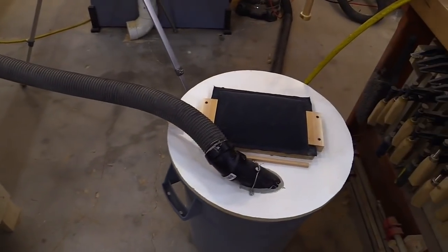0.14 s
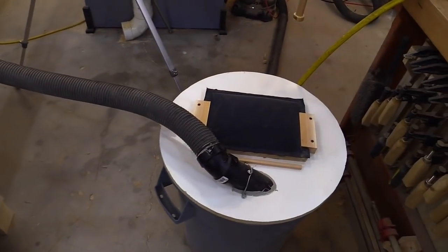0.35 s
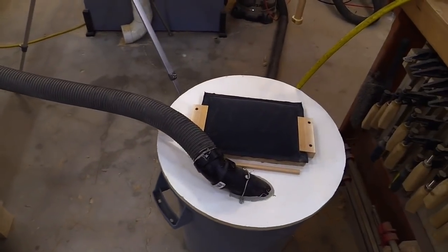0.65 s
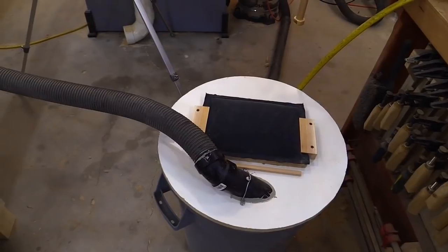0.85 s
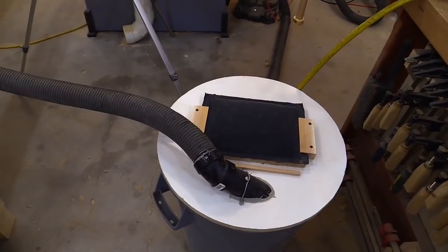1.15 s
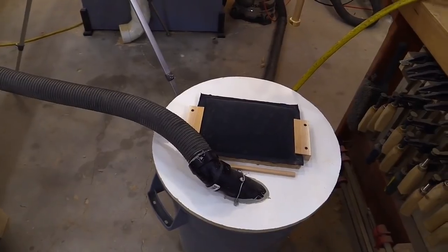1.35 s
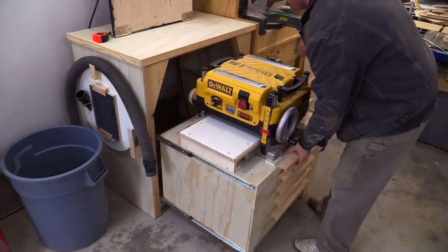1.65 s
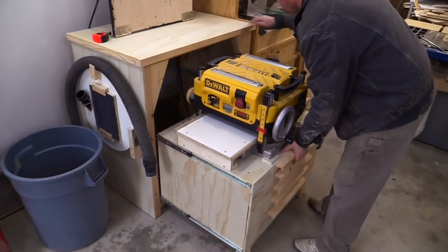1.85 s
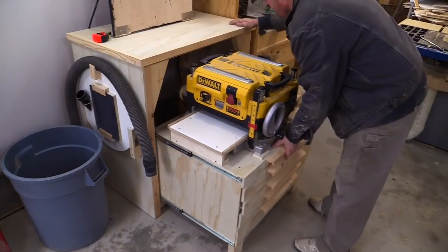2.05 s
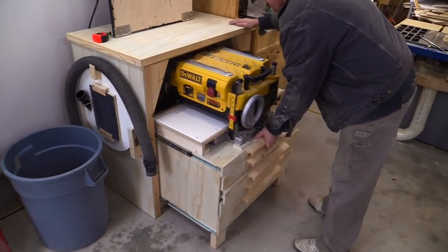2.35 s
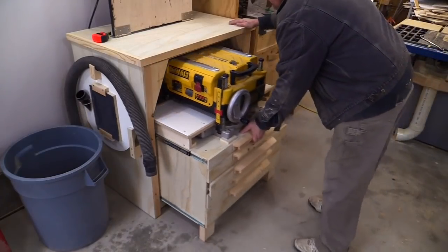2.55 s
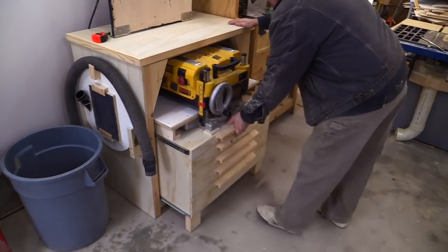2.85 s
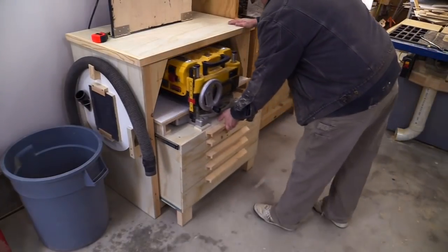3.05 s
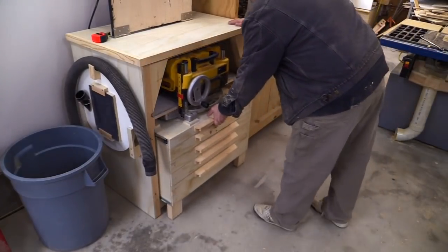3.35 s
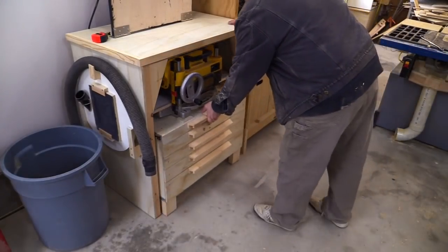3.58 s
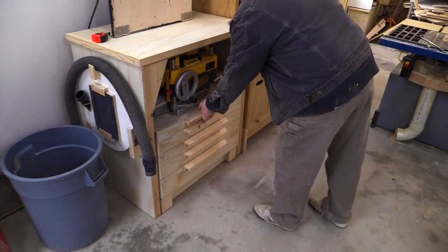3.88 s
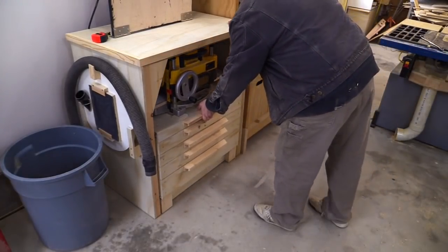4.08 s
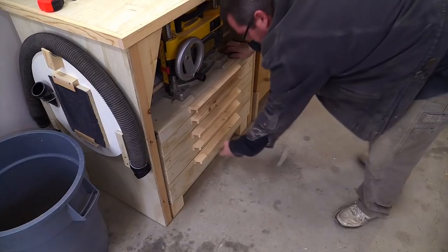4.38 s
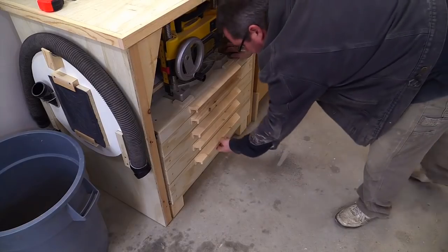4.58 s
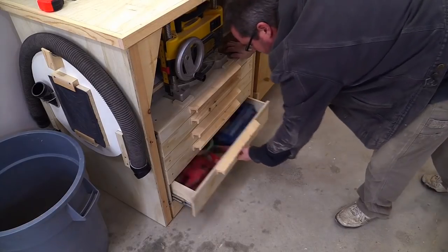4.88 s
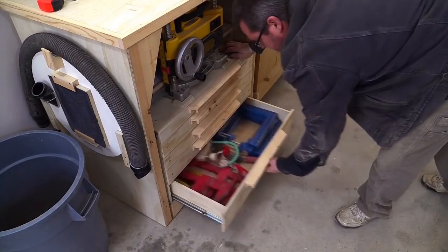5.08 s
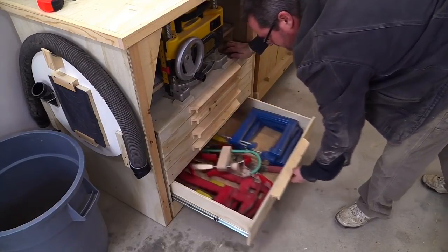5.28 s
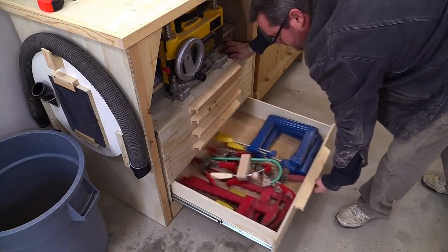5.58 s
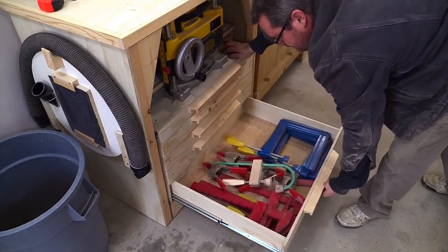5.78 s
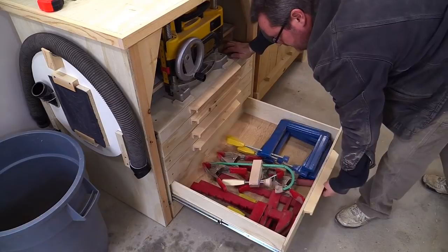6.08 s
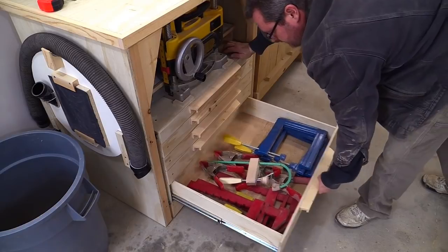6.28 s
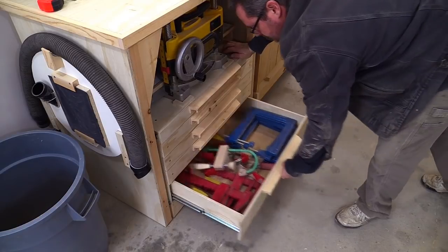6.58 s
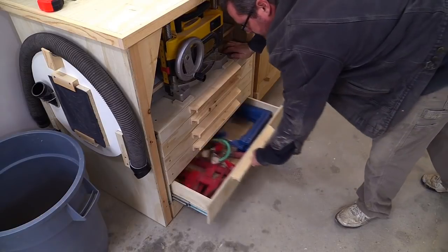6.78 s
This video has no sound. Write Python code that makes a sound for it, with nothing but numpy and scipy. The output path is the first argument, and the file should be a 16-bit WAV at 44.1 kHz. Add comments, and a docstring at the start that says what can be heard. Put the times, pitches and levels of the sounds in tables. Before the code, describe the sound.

In a small workshop, a planer whines steadily at a board, rises slightly in pitch as the board leaves, then breaks off sharply. A heavy carriage groans and rolls on ball-bearing slides into a cabinet, with a hard clack, thuds and a shoe scuff, slowing to a creep. A drawer of tools rolls out more quietly, slams against its stop with clinking clamps, and starts back. Stereo microphones at moderate distance, short room decay.

```python
"""A small workshop, heard by two microphones over its quiet air. A thickness planer whines at its board,
loses the load as the board leaves the knives, and breaks off. After faint handling noise a heavy wooden
carriage groans and rolls into a cabinet on ball-bearing slides, slowing to a creep, with bumps and clacks,
while a shoe scuffs the concrete. A drawer full of tools rolls out, slams against its end stop with its
clamps clinking, and starts to roll back.
Tones make the planer, shaped noise the friction and air, tiny bumps the rolling, ringing modes the blows."""
import sys
import numpy as np
from scipy import signal
from scipy.fft import rfft, irfft, next_fast_len
from scipy.io import wavfile
from scipy.ndimage import uniform_filter1d, minimum_filter1d

SR = 44100
rng = np.random.default_rng(int(sys.argv[2]) if len(sys.argv) > 2 else 0)


def put_to_file(sound):
    """Save the sound as 16-bit audio at rate SR, in the file named by the first command-line argument."""
    columns = np.atleast_2d(sound).T  # one column per channel
    safe = np.clip(columns, -1, 1)
    whole_steps = np.round(safe * 32767)
    wavfile.write(sys.argv[1], SR, whole_steps.astype(np.int16))


N = 305613
TIME = np.arange(N) / SR  # s


def amp(db):
    """Decibels to gain."""
    return 10 ** (np.asarray(db) / 20)


def evened(x):
    """Scales to unit rms."""
    return x / np.sqrt(np.mean(x ** 2) + 1e-20)


def at_level(sound, db):
    """Sets the rms level of the first 40 ms of a blow."""
    return amp(db) * sound / np.sqrt(np.mean(sound[:, :SR // 25] ** 2))


def read(points, hz):
    """Reads a table on a log-frequency axis."""
    f, value = np.transpose(points)
    return np.interp(np.log(hz + 1), np.log(f + 1), value)


def curves(rows):
    """Joins the rows of a timed table by straight lines, one curve per column."""
    s, *columns = np.transpose(rows)
    return [np.interp(TIME, s, column) for column in columns]


def add(mix, s, sound):
    """Mixes a sound in at time s."""
    part = mix[:, round(s * SR):][:, :sound.shape[1]]
    part += sound[:, :part.shape[1]]


def wander(rate, size=N):
    """Random drift through knots of unit spread, `rate` knots per second."""
    knots = rng.standard_normal(2048)
    return np.interp(TIME[:size] * rate, np.arange(len(knots)), knots)


def colour(x, spectrum, tilt_db=0, pitch=1):
    """Causal filter with the given spectrum, tilted in dB per octave about 1 kHz and shifted in pitch."""
    hz = abs(np.fft.fftfreq(4096, 1 / SR))
    tilt = tilt_db * np.log2(np.clip(hz, 200, 5000) / 1000)
    log_gain = np.log(amp(read(spectrum, hz / pitch) + tilt))
    # minimum phase: nothing sounds before the blow
    taps = np.fft.ifft(np.exp(np.conj(signal.hilbert(log_gain)))).real
    return signal.fftconvolve(x, taps[None, :len(taps) // 2], axes=1)[:, :x.shape[1]]


# likeness of the diffuse field at the two microphones: f/Hz, left-right likeness (1 = same)
LIKENESS = [(60, 1), (250, .98), (450, 0.87), (700, 0.58), (1400, 0.57), (3000, 0.45), (7000, 0.38),
            (14000, 1)]
# balance of the diffuse field: f/Hz, left minus right level/dB
BALANCE_DB = [(150, 0), (380, 0.8), (700, 2.5), (2400, 3), (4400, 1.5), (14000, 1)]


def ports(x):
    """Two unrelated signals become a diffuse field at two microphones: alike in the bass, louder on the left."""
    size = next_fast_len(x.shape[1])
    a, b = rfft(x, size)
    hz = np.fft.rfftfreq(size, 1 / SR)
    same = np.clip(read(LIKENESS, hz), -1, 1)
    lean = amp(read(BALANCE_DB, hz) / 2)
    mid = a * np.sqrt((1 + same) / 2)
    side = b * np.sqrt((1 - same) / 2)
    return irfft(np.array([(mid + side) * lean, (mid - side) / lean]), size)[:, :x.shape[1]]


def hiss(size=N):
    """Diffuse white noise at both microphones."""
    return ports(rng.standard_normal((2, size)))


# dying away of the workshop: f/Hz, t60/s (before scaling by `length`)
WORKSHOP_T60 = [(80, 0.56), (250, 0.49), (1000, 0.53), (3000, 0.3341), (6000, 0.15), (14000, 0.41)]


def response(early_db, early_t60, length=1):
    """A blow as it arrives: a quick crack of wood over the workshop dying away band by band."""
    size = SR * 3 // 4
    hz, t, z = signal.stft(hiss(size), SR, nperseg=256)
    decay = amp(-60 * t / (length * read(WORKSHOP_T60, hz)[:, None]))
    tail = signal.istft(z * decay, SR, nperseg=256)[1][:, :size]
    crack = hiss(size) * amp(-60 * TIME[:size] / early_t60)
    return evened(tail) + amp(early_db) * evened(crack)


def ringing(modes, size, contact=0.0012):
    """Decaying modes build up during the contact (s); higher ones reach the microphones more out of step."""
    t, out = TIME[:size], 0
    for hz, db, t60 in modes:
        turn = rng.random() + rng.standard_normal((2, 1)) * min(hz / 6000, 0.3)
        out = out + amp(db - 60 * t / t60) * np.sin(2 * np.pi * (hz * t + turn))
    return evened(out * np.minimum(t / contact, 1))


def blows(rows, body, modes, gain_db, ring_db, early_db, early_t60, length, soft_after=np.inf, soft_hz=5500):
    """Hard contacts: a crack, the room and the struck modes; those later than soft_after (s) land softly."""
    out = np.zeros((2, N))
    for s, db, tilt_db in rows:
        hit = colour(response(early_db, early_t60, length), body, tilt_db)
        if s - rows[0][0] > soft_after:
            hit = signal.lfilter(*signal.butter(2, soft_hz, fs=SR), hit)
        ring = amp(ring_db) * ringing(modes, hit.shape[1])
        add(out, s, at_level(evened(hit) + ring, db + gain_db))
    return out


def speed(t, speeding, slowing, creep):
    """A hand brings the load up to speed, then lets it slow to a creep."""
    rise = np.sin(np.pi / 2 * np.clip(t / speeding, 0, 1))
    fall = np.cos(np.pi / 2 * np.clip((t - speeding) / slowing, 0, 1))
    return np.clip(rise * (creep + (1 - creep) * fall), 0, 1)


# loudness grows as a power of speed: exponents for rolling, rumble, ball chatter
SPEED_POWERS = (1.565, 0.77, 1.82)
STOP_S = 0.12  # the rolling dies away in this time at the end of each stroke


def rolling(strokes, body, bumps_per_s, spread_db, uneven_db):
    """Steel balls run over tiny bumps in the track and shake the wooden box, louder and brighter with speed."""
    out, step = np.zeros((2, N)), SR // 6
    for start, length, speeding, slowing, creep, *levels in strokes:
        t = TIME[:round(length * SR)]
        shaken = np.zeros((2, next_fast_len(len(t) + step)))
        for at in range(0, len(t) + step, step):  # the box answers anew as it travels
            sizes = amp(spread_db * np.minimum(rng.exponential(1, step), 4))
            struck = rng.random(step) < bumps_per_s / SR
            bumps = struck * rng.choice([-1, 1], step) * sizes
            box = evened(colour(response(early_db=0.0, early_t60=0.033), body))
            add(shaken, at / SR, signal.fftconvolve(evened(bumps)[None], box, axes=1))
        hz, spectrum = np.fft.rfftfreq(shaken.shape[1], 1 / SR), rfft(shaken)
        rumble = 1 / (1 + (hz / 320) ** 6)
        chatter = 1 - 1 / (1 + (hz / 1600) ** 6)
        bands = (1 - rumble - chatter, rumble, chatter)
        pace = speed(t, speeding, slowing, creep) * amp(uneven_db * wander(12.6, len(t)))
        stop = np.clip((length - t) / STOP_S, 0, 1)
        for db, power, band in zip(levels, SPEED_POWERS, bands):
            part = irfft(spectrum * band, shaken.shape[1])[:, step:step + len(t)]
            add(out, start, amp(db) * pace ** power * stop * evened(part))
    return out


# quiet air of the shop: f/Hz, relative level/dB per Hz
AIR_SPECTRUM = [(25, -12.5), (60, -41), (125, -7), (300, -6.5), (1000, -9), (3000, -12), (8000, -22.5),
                (15000, -36)]


def shop_air():
    """Steady diffuse noise in the colour of the room's air."""
    return amp(-55) * evened(colour(hiss(), AIR_SPECTRUM))


# grit under sliding soles and cloth: f/Hz, relative level/dB per Hz
GRIT_SPECTRUM = [(300, -18.5), (1200, -1.5), (2500, -1.5), (5300, -1), (8500, -7.5), (11000, -13.5),
                 (15500, -34)]
# soles and cloth sliding, and at 4.423 s a sudden lift of the background noise: start t/s, peak level/dB
# (before the grain), rise t/s, decay t60/s, tilt/dB per octave
SCUFFS = [(1.96, -50, 0.015, 0.77, -2), (2.067, -36, 0.026, 0.83, -3), (2.099, -34.5, 0.016, .25, -5.5),
          (2.199, -34.5, 0.051, 0.69, -5.5), (2.4, -43, 0.0061, 0.33, 1), (2.88, -36.5, .005, 0.39, 1),
          (2.972, -23.5, 0.041, 0.45, -7), (3.266, -37.5, 0.0044, .2, -4.5), (3.959, -52.5, 0.012, .4, -2),
          (4.423, -50, 0.0025, 1, -6.5), (4.445, -39, 0.024, 0.44, -5), (4.599, -34.5, 0.095, .45, 6),
          (4.68, -39, 0.12, 0.83, 9), (4.78, -44, 0.1, 0.3, 5), (5.35, -43, 0.074, 0.69, -4),
          (6.82, -60, 0.026, .3, 7)]


def scuffs(grain_db=1.0):
    """Gritty friction that swells and dies."""
    out, t = np.zeros((2, N)), TIME[:SR]
    for s, db, rise, t60, tilt_db in SCUFFS:
        stroke = np.minimum(t / rise, 1) * amp(-60 * np.maximum(t - rise, 0) / t60)
        grain = amp(db + grain_db * wander(245, SR))
        add(out, s, stroke * grain * evened(colour(hiss(SR), GRIT_SPECTRUM, tilt_db)))
    return out


# body of a dull bump: f/Hz, relative level/dB per Hz
THUD_BODY = [(18, -59), (30, -35), (101, -3.5), (229, 1.5), (296, -3.5), (641, -16.5), (1050, -23),
             (1260, -17.5), (1390, -24), (3450, -33.5), (6040, -48), (7120, -68), (8000, -43.5),
             (10400, -97), (17600, -120)]
# dull bumps of wood and heels: t/s, level/dB, pitch as a factor
THUDS = [(1.779, -46.5, 1.16), (2.904, -15.5, 1.48), (2.925, -18, 1.4), (4.056, -18, 1.14),
         (4.085, -20, 1.35), (4.16, -33.5, 0.87), (4.27, -35.5, 0.78), (4.31, -60, 1.5), (4.603, -37, 0.82),
         (4.68, -38, 0.8), (4.847, -42, 1.27), (4.881, -34, 1.28), (5.364, -21, 0.89), (5.383, -28, 1.1),
         (5.69, -35, 1), (5.738, -40, 1.1), (6.524, -50, 1.4)]


def thuds(panel_hz=135, panel_db=-5, panel_t60=0.089):
    """Soft, heavy contacts push a plywood panel through a few cycles and barely ring."""
    out = np.zeros((2, N))
    for s, db, pitch in THUDS:
        blow = response(early_db=0.0, early_t60=0.44, length=0.68)
        push = evened(colour(blow, THUD_BODY, tilt_db=-1.84, pitch=pitch))
        t = TIME[:push.shape[1]]
        swing = (1 - np.exp(-t / 0.01)) ** 3 * amp(-60 * t / panel_t60)
        panel = swing * np.sin(2 * np.pi * panel_hz * pitch * t)
        add(out, s, at_level(push + amp(panel_db) * evened(panel), db))
    return out


# steel clamps clink in the drawer: t/s, level/dB
CLINKS = [(5.877, -19.5), (5.914, -24), (5.942, -31), (5.972, -30), (6.006, -37), (6.057, -42)]
# ringing of the clamps: f/Hz, relative level/dB, t60/s
CLAMP_MODES = [(1965, -4.5, 0.45), (2000, -6, .45), (2960, -5, 0.082), (2964, 8.5, 0.06), (3120, -15, 0.25)]


def clinks():
    """Loose clamps bounce and settle after the slam, ringing in their own modes."""
    out = np.zeros((2, N))
    for s, db in CLINKS:
        add(out, s, at_level(ringing(CLAMP_MODES, SR // 2), db))
    return out


# the drawer meets its stop and the load jumps: t/s, level/dB (before gain_db), tilt/dB per octave
SLAMS = [(5.861, -26.5, 5), (5.872, -12.5, 1.2), (5.88, -15, -1), (5.912, -14.5, -2.5),
         (5.944, -15.5, -1.4), (5.96, -21, 1.7), (6.025, -28.5, 0.5)]
# body of the slam: f/Hz, relative level/dB per Hz
SLAM_BODY = [(30, -66), (55, -46), (110, -10.5), (200, -4), (410, -7), (720, -2), (900, -7.5), (1340, -8),
             (2010, -8), (2560, -17.5), (3030, -12), (3700, -19.5), (8000, -36.5), (11000, -49.5),
             (15500, -64)]
# ringing of the drawer with its tools: f/Hz, relative level/dB, t60/s
DRAWER_MODES = [(288, -2, 0.36), (417.7, 1.5, 0.38), (592, -11, 0.4), (637, -3, 0.3), (813, 0.5, 0.43),
                (970, -21, 0.43), (1040, -1.5, 0.34), (1530, -21, 0.47), (1800, -8, 0.47),
                (1934, -14, 0.41), (2270, -24, 0.19), (2430, -11, 0.44), (3000, -5, 0.089),
                (4270, -17, 0.38)]


def drawer_slam():
    """The loaded drawer strikes its end stop and rings; the late bounces lose their treble."""
    return blows(SLAMS, SLAM_BODY, DRAWER_MODES, gain_db=0.5, ring_db=-6.5,
                 early_db=-11, early_t60=0.05, length=0.87, soft_after=0.065)


# pulls and pushes of the drawer: start t/s, length t/s, speeding up t/s, slowing down t/s,
# final creep as a share of top speed, then at full speed rolling, rumble and ball chatter level/dB
DRAWER_STROKES = [(4.78, 1.14, 0.41, 0.49, 0.5, -35.5, -43, -50), (6.35, .7, 0.5, 1.2, .4, -34.5, -43, -49)]
# body of the drawer: f/Hz, relative level/dB per Hz
DRAWER_BODY = [(29, -69), (50, -39), (70, -49), (91, -13.5), (253, -0.5), (362, -0.5), (506, 0),
               (1140, -11.5), (1250, -14), (1380, -13), (2170, -20), (7160, -38.5), (8460, -44),
               (15000, -53)]


def drawer_rolling():
    """The tool drawer runs on its slides, out and then back, at an uneven pace."""
    return rolling(DRAWER_STROKES, DRAWER_BODY, bumps_per_s=2200, spread_db=3, uneven_db=2.1)


# the carriage groans as it starts to move: start t/s, length t/s, level/dB
GROANS = [(1.83, .13, -41), (1.931, .13, -30)]


def groan(hz=285, width_hz=45, attack=0.026, release=0.075):
    """The loaded slides stick and slip into one low resonance of the carriage, made by filtering noise."""
    out = np.zeros((2, N))
    for start, length, db in GROANS:
        t = TIME[:round(length * SR)]
        broad = signal.lfilter(*signal.iirpeak(hz, hz / width_hz / 2, SR), hiss(SR))
        tone = signal.lfilter(*signal.iirpeak(hz, hz / width_hz, SR), broad)
        envelope = np.clip(t / attack, 0, 1) * np.clip((length - t) / release, 0, 1)
        add(out, start, amp(db) * envelope * evened(tone[:, -len(t):]))
    return out


# clacks of the slides and the load: t/s, level/dB (before gain_db), tilt/dB per octave
KNOCKS = [(1.627, -34.5, 3.5), (2.37, -19.5, -1), (2.702, -1.5, -0.5), (2.715, -18, -4),
          (2.736, -14.5, 4.5), (2.987, -16.5, 4), (3.008, -11, 0), (3.529, -15, -1), (3.752, -18.5, -4.5),
          (4.051, -29.5, 4.5), (4.29, -33.5, -1.5), (4.603, -38, 4), (4.64, -32, 4), (4.683, -29.5, 2.5),
          (4.918, -25, -6.5), (5.042, -34, -5.5), (5.107, -30, -5.5), (5.362, -25.5, -1), (5.775, -36, 1),
          (6.586, -30.5, 1.5)]
# body of a clack: f/Hz, relative level/dB per Hz
KNOCK_BODY = [(47, -53), (80, -24), (190, -8), (355, -8), (450, -3), (1060, -6.5), (1320, -9),
              (2600, -16.5), (3700, -22), (5500, -29), (8000, -38), (11000, -47.5), (15000, -62)]
# ringing of the carriage: f/Hz, relative level/dB, t60/s
CARRIAGE_MODES = [(447, 11.5, 0.51), (582, -2, 0.5), (764, 9.5, 0.36), (1100, -8, 0.23), (1250, -20, 0.18),
                  (1790, -9.5, .3), (2430, -10.5, 0.064), (3200, -16, .3), (3680, -7, 0.27),
                  (4670, -12, .3), (5150, -6, 0.09)]


def knocks():
    """Hard clacks of the slides and the load excite the modes of the carriage."""
    return blows(KNOCKS, KNOCK_BODY, CARRIAGE_MODES, gain_db=-9.5, ring_db=-11,
                 early_db=-4.5, early_t60=0.04, length=1.0)


# faint handling noise after the planer, then the push of the carriage:
# start t/s, length t/s, speeding up t/s, slowing down t/s, final creep as a share of top speed,
# then at full speed rolling, rumble and ball chatter level/dB
HANDLING_AND_PUSH = [(1.51, 0.57, 0.027, .2, 0.65, -52.5, -63, -53.5),
                     (1.895, 2.51, 0.54, 1.677, .15, -20, -28.5, -31)]
# body of the carriage: f/Hz, relative level/dB per Hz
CARRIAGE_BODY = [(30, -29), (55, -43), (80, -17), (130, -7), (195, 0.5), (290, 0.5), (420, 1), (670, -1.5),
                 (1060, -3.5), (1400, -8.5), (2070, -12.5), (5120, -31.5), (9090, -46.5), (15000, -60)]


def carriage_rolling():
    """After faint handling noise, it smoothly gathers speed, then slows to a creep as it runs into the cabinet."""
    return rolling(HANDLING_AND_PUSH, CARRIAGE_BODY, bumps_per_s=2200, spread_db=3.5, uneven_db=0.14)


def partial(angle, left_db, apart):
    """A pure tone as it reaches the two microphones, of unit level between them."""
    sign = np.array([[1], [-1]]) / 2
    tone = amp(sign * left_db) * np.cos(angle + sign * apart)
    return tone / np.std(tone.mean(0))


BOARD_OUT_S, RELEASE_S = 1.232, 0.038  # the board leaves the knives; the load falls away in this time


def unloaded(t, release):
    """Zero while the knives cut, rising to one once the board has left."""
    return np.clip((t - BOARD_OUT_S) / release, 0, 1) ** 2


# fainter overtones of the knife strokes: f/Hz, relative level/dB
KNIFE_TONES = [(2900, -5), (3900, -5), (4400, -3), (5500, -17), (6300, -15), (7500, -21), (9000, -16.5),
               (10300, -48), (12500, -47), (15000, -46)]
# overtones of the whole turn of the cutter head: f/Hz, relative level/dB
TURN_TONES = [(160, -12.5), (640, -7.5), (1100, -31), (2200, -14), (3200, -9.5), (5000, -11.5), (6500, -17),
              (10200, -23), (12500, -54), (15000, -46.5)]


def faint_overtones(turn, hz, loud, fading_db=6.5, scatter_db=2.0):
    """Unequal knives add the orders of the whole turn; each fades in the standing waves of the shop."""
    upper = np.zeros((2, len(turn)))
    for order in np.setdiff1d(np.arange(1, 90), loud):
        db = read(TURN_TONES if order % KNIVES else KNIFE_TONES, order * hz.mean())
        db = db + fading_db * wander(5.34, len(turn)) + scatter_db * rng.standard_normal((2, 1))
        phase = 2 * np.pi * (rng.random() + 0.12 * rng.standard_normal((2, 1)))
        upper += amp(db) * np.sin(order * turn + phase)
    return evened(upper)


# loud partials of the cutter head: order of the turn, level/dB (before swell and waver),
# fall without the board/dB, left minus right level/dB, phase between the microphones/rad
WHINE = [(3, -12, 11, 1, 0.46), (6, -24, 8, -3, 1.04), (9, -36.5, 2, 6.5, 2.1), (12, -41.5, -2.5, 10, 1.5),
         (14, -43.5, 10, 3, 1), (15, -36, 8, 7, 1.8), (17, -45.5, 6, 6, 1), (18, -43.5, 10, -2, 1.2),
         (20, -42, 17, -6, 1), (21, -36.5, 23, 7, 1.94), (24, -42, 7, -1, 1), (27, -41, 10, 9, 1),
         (28, -50.5, 16, -7, 1), (30, -45.5, 11, 12, 1.5), (31, -55, 2, 7, 1), (39, -50, 12, 5, 1.1)]
# partials swell as the microphone drifts through the standing waves of the shop:
# order of the turn, centre t/s, half width t/s, swell level/dB
SWELLS = [(3, 0.69, 0.2, 1.1), (6, .93, 0.43, 4.5), (6, 1.04, 0.2, 5), (9, 0.42, 0.34, 6),
          (9, 1.28, 0.033, 7.5), (12, 0.48, 0.43, 15), (12, 1.044, 0.069, 11.5), (14, 1.15, 0.18, 8),
          (15, .66, 0.086, 4.5), (15, 1.046, 0.12, 9), (17, .7, 0.23, 4.5), (18, .62, 0.25, 8.5),
          (20, 1.4, .25, 7), (21, 0.86, 0.22, 3.5), (24, 1.05, 0.14, 4), (27, 0.89, 0.36, -1),
          (28, 1.2, .13, 8), (30, 0.55, 0.15, 6.5), (31, .45, 0.2, 14)]


def whine(turn, t, loud, idle, waver_db=2.5, stroke_release=0.21, stroke_hold=0.05):
    """Loud orders of the cutter head change as the board leaves; the tone of the knife strokes lingers."""
    out = np.zeros((2, len(t)))
    for order, (_, db, fall_db, lean_db, apart) in zip(loud, WHINE):
        fallen = unloaded(t - stroke_hold, stroke_release) if order == KNIVES else idle
        swell = sum(gain_db * np.exp(-((t - centre) / width) ** 4)
                    for k, centre, width, gain_db in SWELLS if round(k) == order)
        waver = waver_db * order / np.median(loud) * wander(14.4, len(t))  # short waves waver most
        angle = order * turn + 2 * np.pi * rng.random()
        out += amp(db + swell + waver - fall_db * fallen) * partial(angle, lean_db, apart)
    return out


# planer motor: t/s, shaft f/Hz, level/dB
MOTOR = [(0.0, 311.4, -25.5), (0.066, 313.4, -26), (0.254, 314.9, -25.5), (0.976, 314.1, -20.5),
         (1.274, 314.4, -23.5), (1.394, 319.7, -28), (1.5, 319.7, -25.5)]


def motor(idle, whistle_hz=10200, whistle_db=-54, whistle_rise_db=4):
    """The shaft hums; a blurred whistle rides on its speed and rises in level without the load."""
    size = len(idle)
    shaft_hz, shaft_db = (c[:size] for c in curves(MOTOR))
    hum = amp(shaft_db) * partial(2 * np.pi * np.cumsum(shaft_hz) / SR, left_db=-3.5, apart=0.2)
    whistle = whistle_hz * shaft_hz / np.median(shaft_hz) * (1 + 0.003 * wander(400, size))
    tone = partial(2 * np.pi * np.cumsum(whistle) / SR, left_db=1, apart=0.3)
    return hum + amp(whistle_db + whistle_rise_db * idle) * tone


# knife strokes, quickening as the board leaves the knives: t/s, strokes f/Hz (before jitter)
KNIFE_RATE = [(0, 481), (.25, 485), (.75, 482.8), (1.02, 479.6), (1.2, 481.6), (1.3, 486.8), (1.41, 492.8),
              (1.52, 493.6)]
# rush of noise from the planer: f/Hz, relative level/dB per Hz
RUSH_SPECTRUM = [(25, -24), (80, -18.5), (150, -13.5), (280, -3.5), (600, -2.5), (1300, -5), (2400, -12),
                 (4500, -17.5), (7000, -23.5), (10300, -26), (12500, -34.5), (15500, -47)]
KNIVES, PLANER_END = 3, 1.52  # knives on the head; time the planer breaks off, s


def planer(overtones_db=-33, overtones_fall_db=10, rush_db=-24.5, rush_fall_db=0.5, left_db=3, jitter=0.00062):
    """Three knives on a turning head cut the board: whine, faint overtones, motor and a rush of noise."""
    size = round((PLANER_END + 0.01) * SR)
    t = TIME[:size]
    hz = curves(KNIFE_RATE)[0][:size] / KNIVES
    turn = 2 * np.pi * np.cumsum(hz * (1 + jitter * wander(90, size))) / SR
    loud = [round(row[0]) for row in WHINE]
    idle = unloaded(t, RELEASE_S)
    lean = amp([[left_db / 2], [-left_db / 2]])
    out = amp(overtones_db - overtones_fall_db * idle) * faint_overtones(turn, hz, loud) * lean
    out += whine(turn, t, loud, idle) + motor(idle)
    out += amp(rush_db - rush_fall_db * idle) * evened(colour(hiss(size), RUSH_SPECTRUM))
    out *= np.clip((PLANER_END - t) / 0.0022, 0, 1)  # breaks off in about 2 ms
    return np.pad(out, ((0, 0), (0, N - size)))


def scene():
    """The planer, then the carriage rolling home, then the tool drawer, over the quiet air of the shop."""
    shop = shop_air() + scuffs() + thuds()
    drawer = clinks() + drawer_slam() + drawer_rolling()
    carriage = groan() + knocks() + carriage_rolling()
    return shop + drawer + carriage + planer()


EDGE_HZ = 15700  # upper band limit


def record(dry, ceiling=1.0):
    """A quick limiter holds the peaks under full scale; then the band limit."""
    allowed = ceiling / np.maximum(abs(dry).max(0), ceiling)
    gain = uniform_filter1d(minimum_filter1d(allowed, size=129), size=129)
    low_pass = signal.firwin(511, EDGE_HZ, window=("kaiser", 9), fs=SR)
    return signal.oaconvolve(dry * gain, low_pass[None], "same")


dry = scene()
out = record(dry)
put_to_file(out)
```